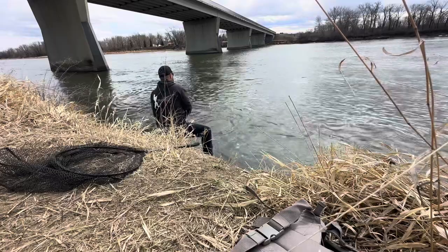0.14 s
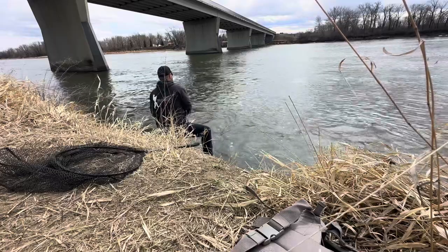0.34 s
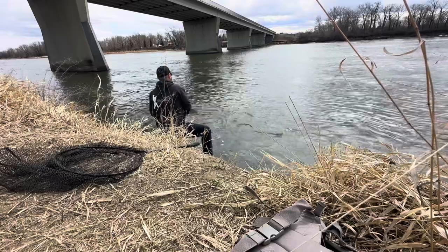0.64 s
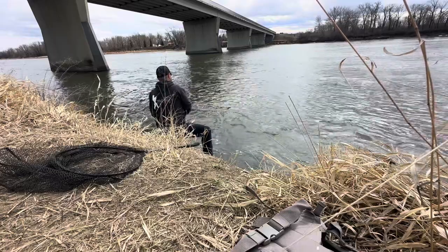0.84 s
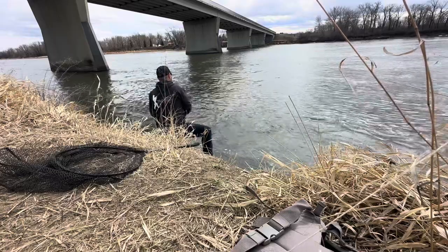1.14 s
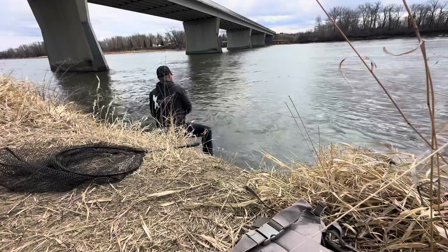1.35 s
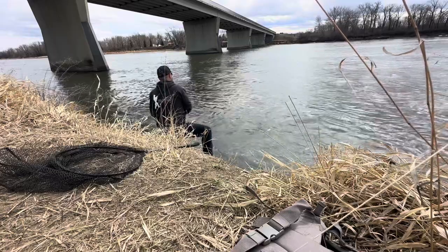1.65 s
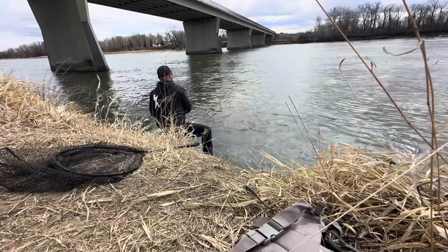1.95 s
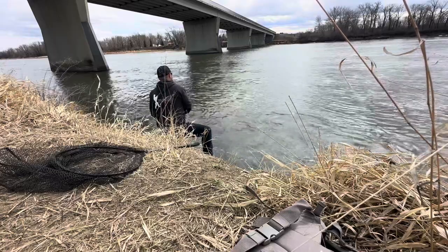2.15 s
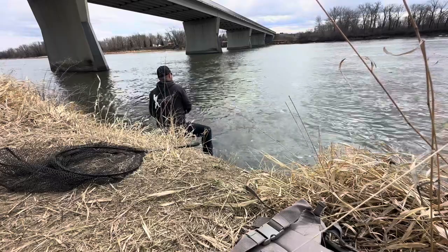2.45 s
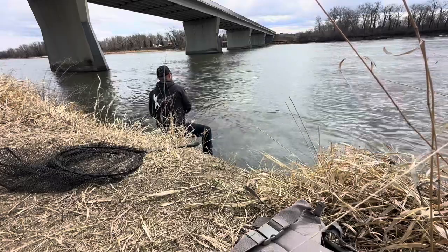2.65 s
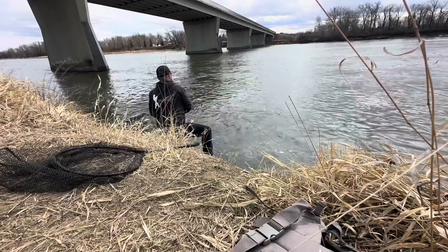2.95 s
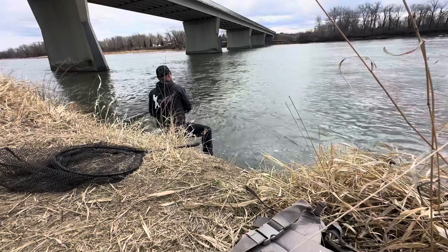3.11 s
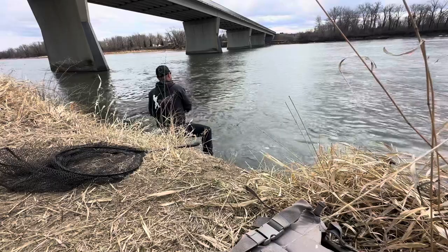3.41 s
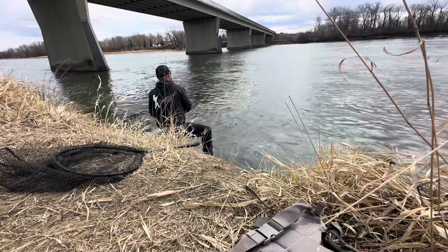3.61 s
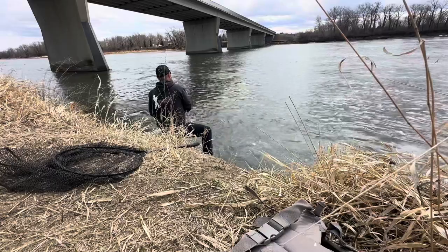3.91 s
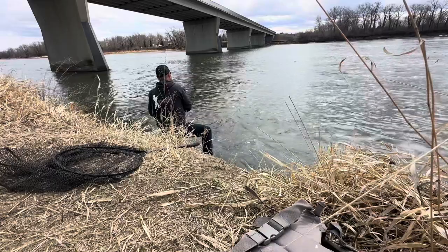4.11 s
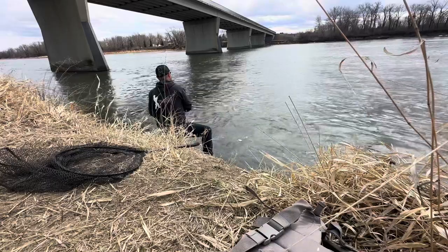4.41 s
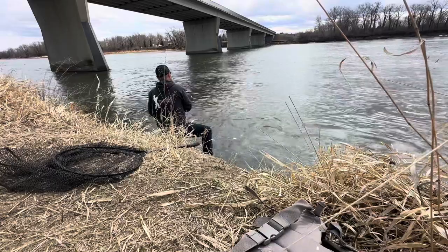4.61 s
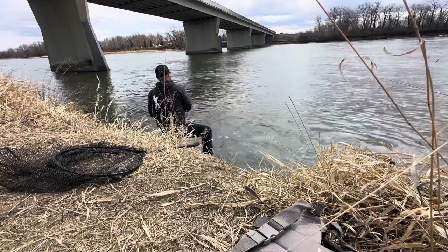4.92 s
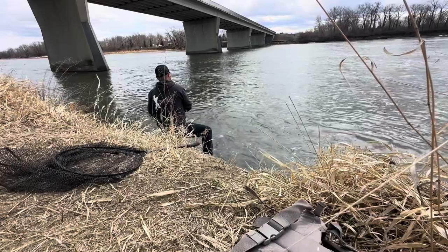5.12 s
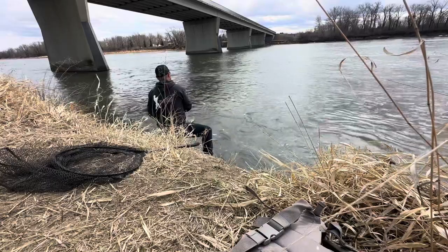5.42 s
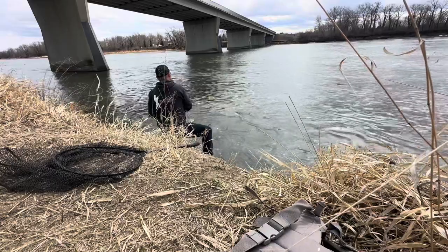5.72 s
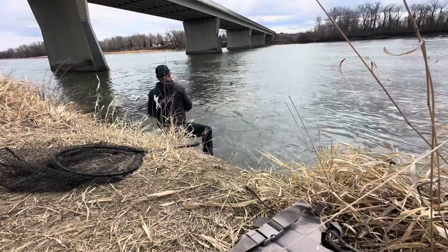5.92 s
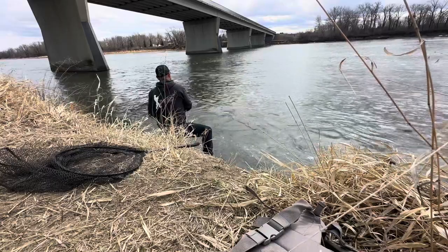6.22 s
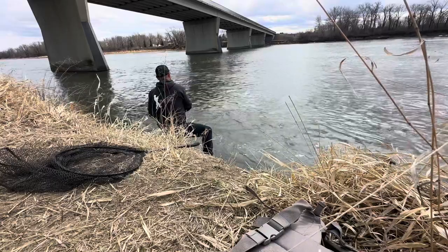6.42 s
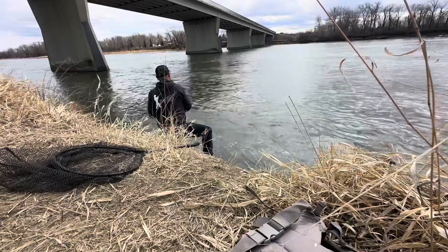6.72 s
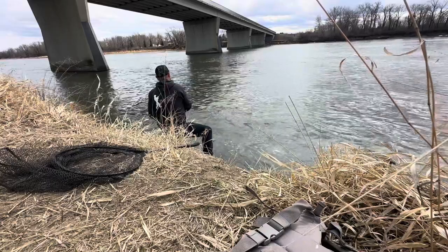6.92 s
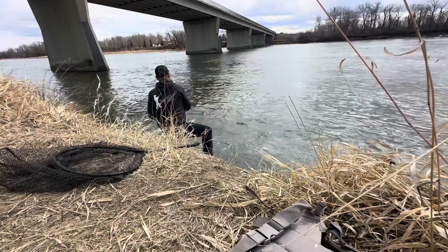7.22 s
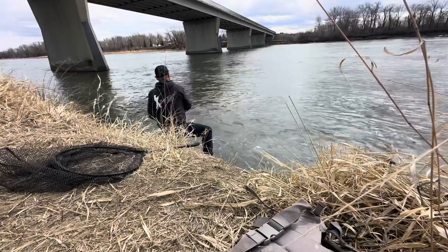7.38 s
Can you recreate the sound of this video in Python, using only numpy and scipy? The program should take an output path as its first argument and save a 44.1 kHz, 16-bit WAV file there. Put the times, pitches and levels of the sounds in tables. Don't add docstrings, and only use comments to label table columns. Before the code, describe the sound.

A stereo microphone low in dry riverside grass hears a truck coming along a concrete bridge. First comes muffled rumble and distant traffic; then paired dull thumps over the joints, a soft engine hum and broad tyre roar growing steadily. Toward the end it is loudest, fuller and hissier on the left, with a deep girder drone. Tiny stalk ticks and thin crackles stay close and quiet.

```python
import sys
import numpy as np
from scipy import signal
from scipy.io import wavfile
from scipy.ndimage import uniform_filter1d

SR = 44100
rng = np.random.default_rng(int(sys.argv[2]) if len(sys.argv) > 2 else 0)


def field_ratio(decibels):
    return 10 ** (np.asarray(decibels, dtype=float) / 20)


def transcribe(signal):
    frames = np.atleast_2d(signal).T
    limited = np.clip(frames, -1, 1)
    pcm = np.round(limited * 32767).astype(np.int16)
    wavfile.write(sys.argv[1], SR, pcm)


N = 332955
FRAME, HOP = 2048, 512
HZ = np.fft.rfftfreq(FRAME, 1 / SR)[:, None]
TIMES = np.arange(N // HOP + 5) * HOP / SR

# [t/s, left port lead/s]
BEARING_LEAD = [(0, -.00018), (2, -.00013), (3.5, -.00009), (4.7, 0), (5.7, .00013), (6.2, .00024),
                (6.7, .00038), (7.55, .00052)]
# [t/s, gain/dB]
APPROACH_GAIN = [(0, -15), (1, -15.5), (1.5, -12.5), (2, -12), (3, -10), (3.5, -8.5), (4, -7), (4.4, -6.5),
                 (4.8, -4), (5.6, -2), (6.1, -1.5), (6.55, -1), (6.9, 1), (7.15, 0.2), (7.55, 1.2)]
# [t/s, peak/dB, f/Hz]
DECK_THUMPS = [(1.223, -39, 113), (1.767, -26.5, 90), (2.301, -21, 103.3), (2.837, -23, 123.7),
               (2.942, -28, 135.5), (3.161, -26.5, 100.2), (3.41, -20, 89), (3.468, -28, 101),
               (3.998, -18, 92.3), (4.049, -26, 86.5), (4.519, -26.5, 72.5), (4.808, -25.5, 92.4),
               (5.059, -21.5, 84.4), (5.114, -23, 98), (5.598, -23, 76.4), (5.684, -18.5, 73),
               (6.202, -34, 81.4), (6.789, -23.5, 165.1), (7.336, -26, 93.6)]


def truck():
    lead_s = curves(BEARING_LEAD)[0]
    return noise(boom() + roar() + hiss(), lead_s, patchy_db=0.96)


def boom():
    # [f/Hz, density/dB]
    deck_colour = [(15, -40.5), (28, -27.5), (45, -9.5), (70, -6), (110, -2.5), (150, -5), (200, -3),
                   (260, -16), (400, -47), (600, -100)]
    # [t/s, girder resonance/Hz, slab resonance/dB]
    span = [(0, 89, .4), (2, 92, 2.6), (3, 99, -4), (4, 90, -12.5), (5, 80, -16), (6.2, 65, 4.5),
            (7.55, 62, 4.5)]
    # [t/s, boom level/dB]
    load = [(0, -33), (.25, -36), (.75, -33.5), (1.05, -37.5), (1.7, -34.5), (2.1, -32), (3.05, -33.5),
            (3.6, -31), (4.3, -29), (4.9, -32.5), (5.5, -30.5), (6.1, -32), (6.5, -28.5), (7.15, -27.5),
            (7.55, -23)]
    shudder_db, shudder_lag_s, shudder_s = 1.5, 0.01, 0.13
    girder_hz, slab_db = curves(span)
    deck_db = colour(deck_colour) + 7.9 * bump(girder_hz, 0.43) + slab_db * bump(207, 0.38)
    s, thump_db, _ = np.transpose(DECK_THUMPS)
    shudder = field_ratio(thump_db - thump_db.max()) @ swells(s + shudder_lag_s, shudder_s)
    return power(deck_db, curves(load)[0] + shudder_db * shudder)


def roar():
    # [f/Hz, density/dB]
    roar_colour = [(100, -25), (180, -6.5), (300, -1.5), (450, -3.5), (600, -1.5), (750, -2), (900, -5.5),
                   (1150, -4), (1400, -18), (2200, -59)]
    # [t/s, centre/Hz, lift/dB]
    reflection = [(0, 620, -4), (1.5, 625, 3), (2.5, 572, 9.5), (3, 568, 13.5), (3.5, 484, 7.5),
                  (4.4, 455, 9.4), (4.8, 374, 8.5), (5.6, 310, 7), (6.5, 327, 3.5), (7.55, 340, 3.5)]
    near_roar_db = -32
    lead_s, near_db = curves(BEARING_LEAD)[0], curves(APPROACH_GAIN)[0]
    centre_hz, lift_db = curves(reflection)
    lean_db = -1.0 + 10000 * lead_s * bump(560, 0.42)
    shape_db = colour(roar_colour) + lift_db * bump(centre_hz, 0.31)
    return power(shape_db, near_roar_db + near_db, lean_db)


def hiss():
    # [f/Hz, density/dB]
    hiss_colour = [(800, -17), (1100, -5.5), (1500, -5.5), (2000, -9.5), (2400, -11), (2700, -15.5),
                   (3000, -17.5), (3400, -19), (3900, -19.5), (4300, -21.5), (4800, -22.5), (5500, -26),
                   (6300, -30), (8200, -43.5), (11500, -100)]
    # [t/s, gain at 5 kHz/dB, length/s]
    brightenings = [
        (.1, 11, .35),
        (3.4, 1, .25),
        (5.2, 2, .3),
        (6.15, 2.5, .3),
        (6.85, 1, 0.1),
    ]
    near_hiss_db, approach_share = -43.5, 0.64
    speed_m_s, arrival_s, air_db_per_m = 22.1, 6.68, 0.3244
    shade_from_s, shade_db_per_ms, shade_max_db = .00005, 45.5, 10.5
    catch_from_s, catch_rise_s, catch_left_db, catch_right_db = 6.4, .4, 6, -1.5
    peak_s, peak_db, peak_length_s = 6.85, 2.5, .17
    lead_s, near_db = curves(BEARING_LEAD)[0], curves(APPROACH_GAIN)[0]

    road_left_m = speed_m_s * np.maximum(arrival_s - TIMES, 0)
    s, gap_db, length_s = np.transpose(brightenings)
    lost_db = air_db_per_m * road_left_m - gap_db @ swells(s, length_s)
    air_db = -lost_db * np.minimum(HZ / 5000, 1.3) ** 1.1
    shade_db = np.clip(shade_db_per_ms * 1000 * (lead_s - shade_from_s), 0, shade_max_db)
    level_db = near_hiss_db + approach_share * near_db
    tyre_hiss = power(colour(hiss_colour) + air_db, level_db, shade_db * bump(5400, 0.44))

    close = np.clip((TIMES - catch_from_s) / catch_rise_s, 0, 1)
    left_db = catch_left_db * close + peak_db * swells(peak_s, peak_length_s)[0]
    right_db = catch_right_db * close
    left_band_db = left_db * bump(3020, .08)
    right_band_db = right_db * bump(2330, .07) + .6 * left_band_db
    return tyre_hiss * field_ratio(2 * np.array([left_band_db, right_band_db]))


def hums():
    return engine() + girder() + tread() + singing_cars() + turbo()


def engine():
    from_s, to_s, edge_s, edge_db = 0.94, 6.02, 1.6, -3.5
    edge = np.clip(1 - np.minimum(TIMES - from_s, to_s - TIMES) / edge_s, 0, 1)
    firing = track(from_s, to_s, 166.8 * doppler(), -44.5 + edge_db * edge)
    return hum(firing, width_hz=4, clean=.93)


def girder():
    # [t/s, f/Hz, level/dB]
    girder_line = [(6.1, 66.3, -52), (6.35, 66.6, -26), (6.55, 63.9, -39.5), (6.9, 65.3, -37.5),
                   (7.15, 63, -36), (7.4, 62.9, -32), (7.55, 63.5, -34)]
    return hum(girder_line, width_hz=9, clean=.6)


def tread():
    from_s, fade_from_s, fade_db_per_s, approach_share = 1.1, 4.2, 1.2, .42
    near_db = curves(APPROACH_GAIN)[0]
    level_db = -51 + approach_share * near_db - fade_db_per_s * np.maximum(TIMES - fade_from_s, 0)
    treading = track(from_s, TIMES[-1], 582 * doppler(), level_db)
    return placed(hum(treading, width_hz=26, clean=.35), 1.2)


def singing_cars():
    # [t/s, level/dB, length/s]
    songs = [
        (3.17, -52.5, 0.062),
        (4.467, -48, .13),
        (5.21, -46.5, 0.13),
        (5.79, -56, 0.041),
        (6.14, -46, .15),
        (6.58, -53, 0.057),
        (7.2, -45, 0.089),
    ]
    song_hz, song_floor_db = 1202, -60
    s, song_db, length_s = np.transpose(songs)
    level_db = song_floor_db + (song_db - song_floor_db) @ swells(s, length_s)
    singing = track(0, TIMES[-1], song_hz, level_db)
    common, left, right = (hum(singing, width_hz=77, clean=0) for part in range(3))
    return 0.77 * placed(common, -6.0) + 0.56 * np.array([left, right])


def turbo():
    # [t/s, f/Hz, level/dB]
    whine = [(5.85, 13000, -97), (6.1, 13050, -93), (6.6, 12850, -93), (7.0, 12600, -94)]
    return placed(hum(whine, width_hz=110, clean=.2))


def joints():
    # [t/s, peak/dB, f/Hz]
    slaps = [(1.497, -40, 603), (1.754, -38.5, 717), (2.328, -45, 296), (2.62, -41, 556), (2.799, -38, 575),
             (3.16, -31, 561), (3.285, -60, 589), (3.396, -30, 481), (3.459, -34, 626), (3.52, -37, 524),
             (3.929, -33.5, 432), (3.988, -32.5, 526), (4.478, -38.5, 454), (4.685, -41, 370),
             (5.046, -26, 362), (5.109, -27.5, 320), (5.585, -27.5, 339), (5.644, -26, 354.5),
             (5.69, -32, 583), (6.837, -32, 350), (7.329, -27.5, 338.5), (7.368, -27, 333)]
    slap_early_s, thump_late_s = .004, .006
    tyres, deck = np.zeros(N), np.zeros(N)
    for s, db, hz in slaps:
        add(tyres, s - slap_early_s, blow(db + .5, hz, rise_s=.003, t60=.14, spread=.3))
    for s, db, hz in DECK_THUMPS:
        add(deck, s + thump_late_s, blow(db - 2.0, hz, rise_s=.006, t60=.24, spread=.25))
    return placed(tyres) + deck


def blow(db, hz, rise_s, t60, spread):
    scatter_rad = 1.3
    t = np.arange(round(.4 * SR)) / SR
    phase = rng.uniform(-scatter_rad, scatter_rad, (7, 1))
    detune = np.linspace(-1, 1, 7)[:, None] + .12 * phase[::-1]
    modes = np.sin(2 * np.pi * hz * (1 + spread * detune) * t + phase)
    cluster = (modes * np.exp(-1.5 * detune ** 2)).sum(0)
    ring = cluster * (1 - np.exp(-t / rise_s)) ** 2 * field_ratio(-60 * t / t60)
    return field_ratio(db) * ring / abs(ring).max()


def grass():
    # [t/s, peak/dB, f/Hz]
    ticks = [(0.4184, -71, 8580), (0.5476, -65, 9200), (0.9033, -74, 9400), (1.0894, -78, 9250),
             (1.488, -78, 9050), (1.5863, -74, 8280), (1.8471, -69, 9520), (1.8784, -67, 9430),
             (1.942, -71, 8400), (1.978, -70, 9520), (2.5625, -76, 9570), (3.035, -72, 9110),
             (3.12, -67, 8890), (3.2644, -76.5, 8220), (3.393, -68, 6800), (3.702, -74.5, 8570),
             (3.825, -73, 8350), (4.2293, -72, 8730), (4.785, -72, 9420), (5.1898, -74, 8550),
             (5.8666, -69, 8140), (6.2048, -70, 8730), (6.7221, -68, 8470), (7.0256, -69, 8030),
             (7.195, -61, 9200), (7.1965, -65, 8450), (7.3264, -64, 8200), (7.495, -63, 9800)]
    # [t/s, peak/dB, f/Hz]
    fizz = [(0.6759, -77, 13600), (0.9248, -81, 13850), (3.3797, -79, 14100), (3.3942, -69, 14500),
            (3.408, -67, 14700), (3.45, -73.5, 14600), (3.478, -73.5, 13930), (3.5189, -80, 14400),
            (5.0105, -83, 13500), (5.2, -81, 14400), (6.2048, -69.5, 13200), (6.8638, -78, 13400),
            (7.1906, -73, 13800), (7.208, -62, 14700), (7.3068, -70, 13900), (7.3253, -63, 14600)]
    # [t/s, peak/dB, f/Hz]
    chirps = [(1.6007, -66, 3530), (1.6594, -61.5, 3660), (1.8517, -63, 3620), (3.2895, -64, 3650),
              (3.3494, -67.5, 4080), (3.6794, -67, 4130), (5.0429, -62, 3804), (2.037, -62.5, 4650),
              (3.4002, -65, 4850), (4.587, -56.5, 4650)]
    out = rustle()
    for stalks, pan_db, alike in (ticks, -13, .6), (fizz, -1.5, 3.0), (chirps, -5, .6):
        sides = field_ratio(np.array([[pan_db / 2], [-pan_db / 2]]))
        for s, db, hz in stalks:
            add(out, s, field_ratio(db) * scratch(hz, alike) * sides)
    return out


def rustle():
    # [f/Hz, density/dB]
    rustle_colour = [(1500, -29.5), (2500, 3), (3500, -5), (4600, -12.5), (6300, -15.5), (8200, -21.5),
                     (9000, -19.5), (9600, -16), (10300, -31.5), (11500, -48), (13500, -27), (14500, -34),
                     (15500, -45)]
    # [f/Hz, left minus right/dB]
    rustle_pan = [(2500, -2), (5400, 7), (8200, -1), (9500, -7.5), (11500, -4.5)]
    # [t/s, lift/dB, length/s]
    breeze = [
        (.25, 0.5, .3),
        (1.9, 1.5, 0.16),
        (3.352, 4, 0.3),
        (6.848, 3, 0.17),
    ]
    s, lift_db, length_s = np.transpose(breeze)
    level_db = -69 + lift_db @ swells(s, length_s)
    return noise(power(colour(rustle_colour), level_db, colour(rustle_pan)), 0, patchy_db=2.0, gusty_db=1.1)


def scratch(hz, alike):
    t = np.arange(900) / SR
    shared, *own = rng.standard_normal((3, 900))
    burst = (alike * shared + np.array(own)) * field_ratio(-60 * t / .025)
    edges_hz = np.clip([hz * .85, hz * 1.09], 100, 16000)
    burst = signal.sosfilt(signal.butter(2, edges_hz, "band", fs=SR, output="sos"), burst)
    return burst / abs(burst).max()


def far_traffic():
    # [f/Hz, density/dB]
    drone_colour = [(15, -62), (25, -36), (59, -4), (139, -4.5), (172, -5.5), (189, -9.5), (344, -19.5),
                    (477, -26.5), (954, -20), (1130, -24), (1230, -17), (1350, -35), (2500, -48.5),
                    (3250, -80), (5500, -120)]
    drone_power = power(colour(drone_colour), -40.5 + 1.0, -2.5 * (HZ > 600))
    return noise(drone_power, lead_s=-0.00021, patchy_db=-1.0)


def noise(layer_power, lead_s, patchy_db, gusty_db=0):
    # [f/Hz, correlation]
    likeness = [(60, 0.99), (150, 0.98), (300, 0.89), (500, 0.82), (900, 0.61), (2000, 0.41), (3000, 0.44),
                (4500, 0.19)]
    shortcut, shortcut_hz = .27, 1200
    a, b, c, d, patches = rng.standard_normal((len(TIMES), len(HZ), 5)).T
    gusts = evened(uniform_filter1d(patches[0], size=3))
    patches = uniform_filter1d(patches, size=16, axis=0)
    patches = evened(uniform_filter1d(patches, size=8, axis=1))
    same = np.clip(colour(likeness), -1, 1)
    turn = 2 * np.pi * HZ * lead_s * HZ ** 4 / (HZ ** 4 + 125 ** 4)
    turn = turn * (1 - shortcut * HZ ** 4 / (HZ ** 4 + shortcut_hz ** 4))
    left = a + 1j * b
    right = (same * left + np.sqrt(1 - same ** 2) * (c + 1j * d)) * np.exp(-1j * turn)
    z = np.array([left, right]) * np.sqrt(layer_power) * field_ratio(patchy_db * patches + gusty_db * gusts)
    x = signal.istft(z, nperseg=FRAME, noverlap=FRAME - HOP)[1][:, :N]
    return x * np.sqrt(3 / 8)


def power(shape_db, level_db, pan_db=0):
    size = field_ratio(2 * shape_db + 0 * TIMES)
    size = size / size.sum(0) * field_ratio(2 * level_db)
    return np.array([size * field_ratio(pan_db), size * field_ratio(-pan_db)])


def hum(rows, width_hz, clean):
    t = np.arange(N) / SR
    hz, level_db = curves(rows, t)
    r = np.exp(-np.pi * width_hz / SR)
    a, b = (evened(signal.lfilter([1], [1, -2 * r, r * r], v)) for v in rng.standard_normal((2, N)))
    clean = np.clip(clean, 0, 1)
    wander = clean * np.sqrt(2) + np.sqrt(1 - clean ** 2) * (a + 1j * b)
    line = np.exp(2j * np.pi * np.cumsum(hz) / SR) * wander
    fade = np.clip(np.minimum(t - rows[0][0] + 0.027, rows[-1][0] + 0.032 - t) / 0.12, 0, 1)
    return line.real * field_ratio(level_db) * fade


def doppler():
    return 1 - .085 * curves(BEARING_LEAD)[0] / .001


def placed(x, pan_db=0):
    n = np.arange(N)
    shift = curves(BEARING_LEAD, n / SR)[0] * SR / 2
    return np.array([field_ratio(k * pan_db / 2) * np.interp(n + k * shift, n, x) for k in (1, -1)])


def track(start_s, end_s, hz, level_db):
    rows = np.transpose(np.broadcast_arrays(TIMES, hz, level_db))
    return rows[(TIMES >= start_s) & (TIMES <= end_s)]


def swells(s, length_s):
    return np.exp(-((TIMES - np.reshape(s, (-1, 1))) / np.reshape(length_s, (-1, 1))) ** 2)


def bump(centre_hz, width):
    return np.exp(-(np.log((HZ + 1) / centre_hz) / width) ** 2)


def colour(points):
    f, value = np.transpose(points)
    return np.interp(np.log(HZ + 1), np.log(f + 1), value)


def curves(rows, t=TIMES):
    s, *columns = np.transpose(rows)
    return [np.interp(t, s, c) for c in columns]


def evened(x):
    return x / np.sqrt(np.mean(x ** 2) + 1e-20)


def add(mix, s, sound):
    part = mix[..., round(s * SR):][..., :sound.shape[-1]]
    part += sound[..., :part.shape[-1]]


def scene():
    return truck() + hums() + joints() + grass() + far_traffic()


def top_cut(x):
    return signal.sosfilt(signal.butter(12, 15200, fs=SR, output="sos"), x)


def record(dry):
    taper = np.clip(.3 + np.arange(N)[::-1] / 400, 0, 1)
    return top_cut(dry * taper)


dry = scene()
out = record(dry)
transcribe(out)
```